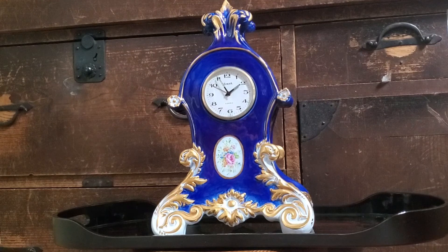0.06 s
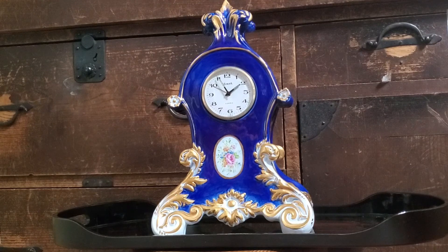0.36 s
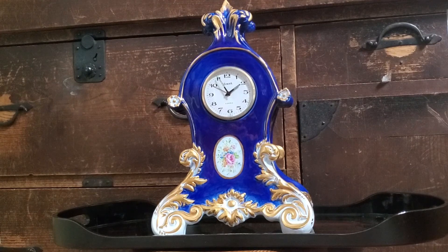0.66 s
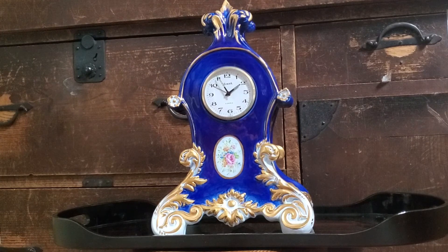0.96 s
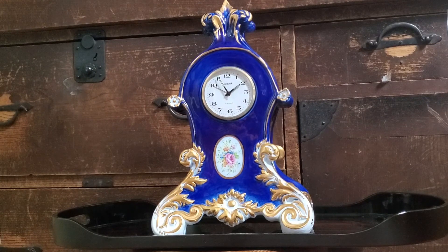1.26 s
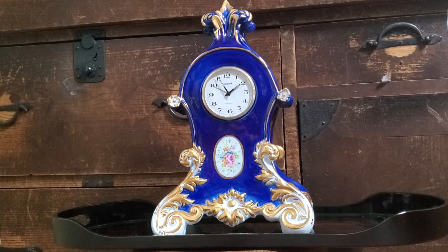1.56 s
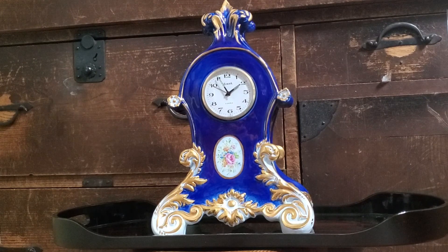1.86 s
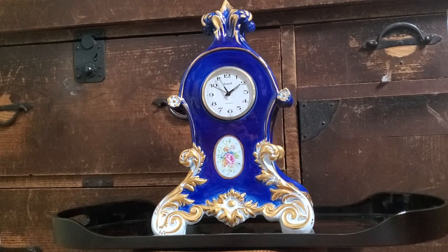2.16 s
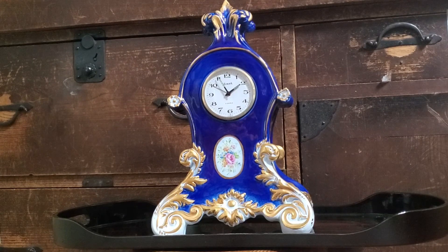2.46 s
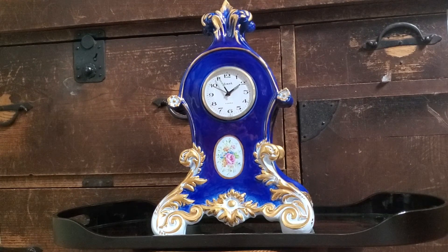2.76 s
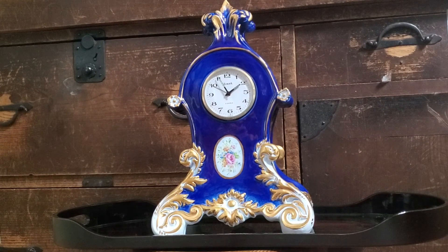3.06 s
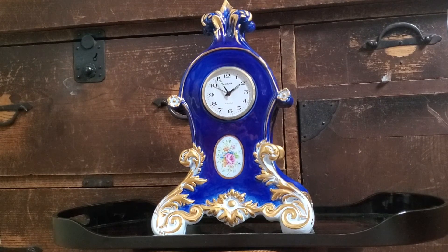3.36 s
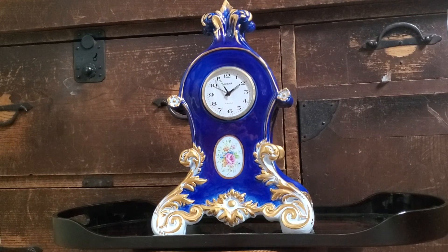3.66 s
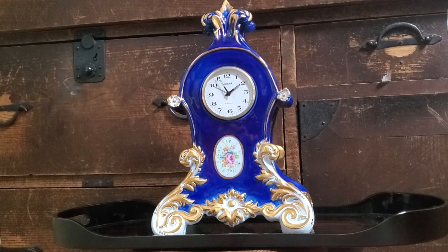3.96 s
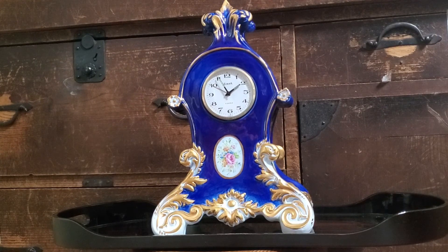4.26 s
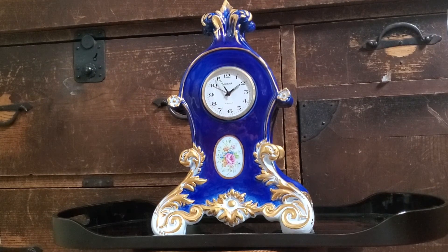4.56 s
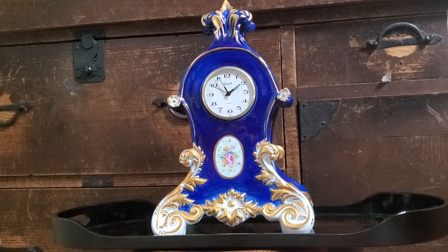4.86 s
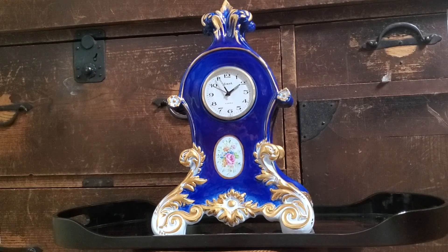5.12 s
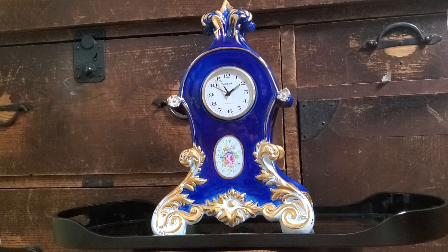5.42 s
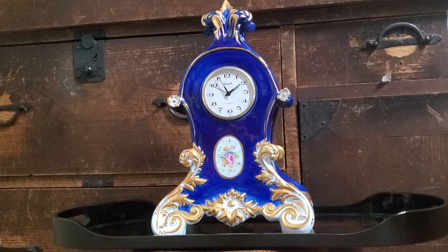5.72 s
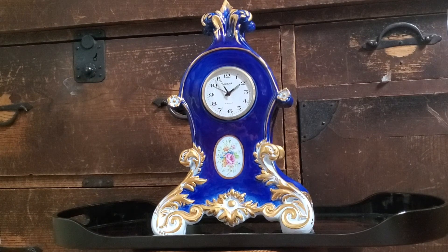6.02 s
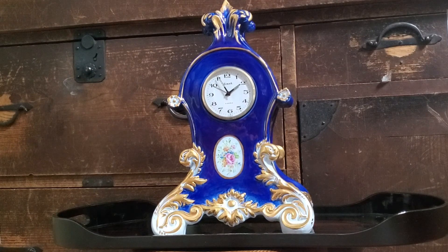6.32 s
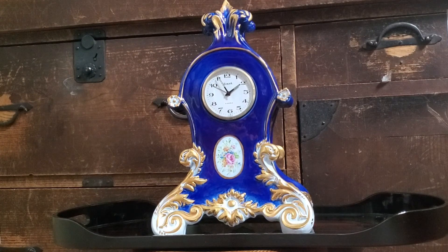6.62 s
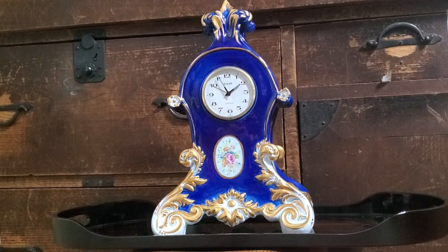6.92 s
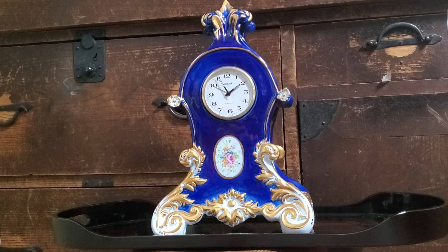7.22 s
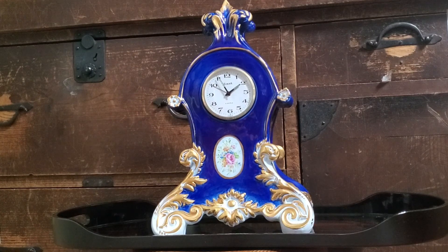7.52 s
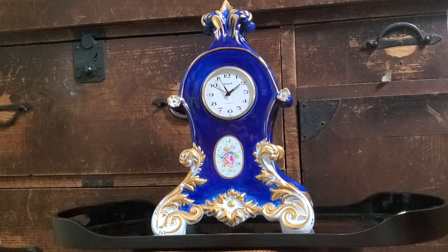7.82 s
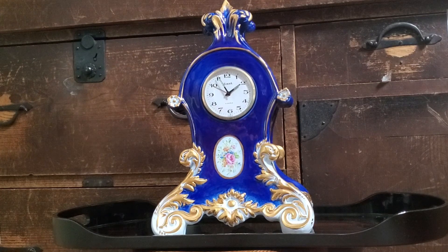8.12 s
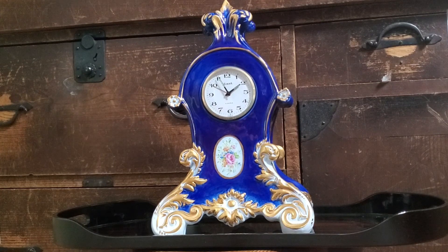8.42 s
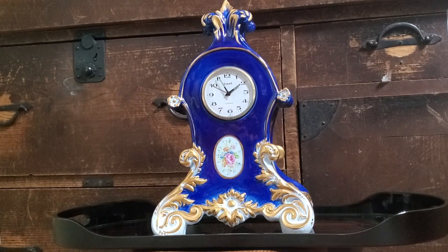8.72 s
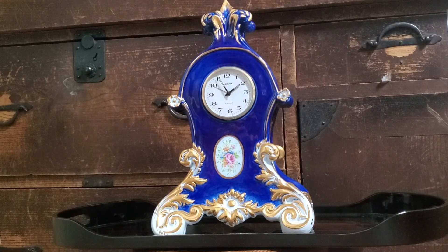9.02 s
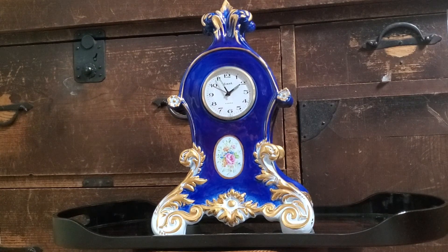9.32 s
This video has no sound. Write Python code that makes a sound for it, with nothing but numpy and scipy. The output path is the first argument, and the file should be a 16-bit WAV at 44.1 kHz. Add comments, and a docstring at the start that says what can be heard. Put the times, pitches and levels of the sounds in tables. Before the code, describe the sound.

Fast, bright, metallic ticking from a wind-up porcelain clock, with a soft throbbing hum and low rumble behind it.

```python
"""A small wind-up clock in a porcelain case ticks five times a second in a quiet room.
At each beat a rocking lever catches a toothed wheel with one of its two tips. This quick run of tiny hits
rings the brass works and the case; the tips strike differently, so tick and tock differ.
Far off, a motor hums and throbs over a low rumble, and a few faint knocks sound in the room."""
import sys
import numpy as np
from scipy import signal
from scipy.fft import rfft, irfft
from scipy.io import wavfile

SR = 44100
rng = np.random.default_rng(int(sys.argv[2]) if len(sys.argv) > 2 else 0)


def generate_wav(signal):
    """Clip the signal to [-1, 1] and save it as 16-bit WAV at the path in sys.argv[1]."""
    frames = np.transpose(np.atleast_2d(signal))
    scaled = np.clip(frames, -1, 1) * 32767
    pcm = np.round(scaled).astype(np.int16)
    wavfile.write(sys.argv[1], SR, pcm)


N = 418068
TIME = np.arange(N) / SR

# Levels in the tables are relative. A fade time is how long a sound takes to drop by 60 dB.
# hits in one beat (release, push, landing, bounces): (time from landing [ms], level [dB], hardness [0-1])
TICK_HITS = [(-8.8, -3.5, .17), (-4.8, -5, .12), (-1.8, -3, .2), (0.3, 0, 1), (2.3, -1.5, 1), (4.8, 0, .9),
             (7.3, -6, .8), (19, -15, 1), (25, -10.5, 1)]
TOCK_HITS = [(-9.2, -5, .9), (-5.8, -6, .9), (-2, -4, .95), (0.4, -1, 1), (3, -3, .8), (6, -3, .6),
             (10, -11, .8), (20, -13, .9)]
# how hard the wheel drives each tip of the lever: (time [s], level [dB])
TICK_DRIVE = [(0.4, -48.1), (2.4, -46.7), (2.8, -49.0), (3.21, -45.7), (3.61, -49.2), (5.21, -47.1),
              (6.01, -50.2), (6.42, -46.8), (9.22, -47.3)]
TOCK_DRIVE = [(0.2, -49.8), (1.8, -51.5), (4.61, -51.4), (5.01, -48.1), (5.81, -49.5), (6.21, -53.0),
              (7.02, -50.5), (9.42, -52.2)]
# ringing notes of works and case: (pitch [Hz], tick level [dB], tock level [dB], fade time [s])
CLOCK_NOTES = [(1152, -19, -22, 0.1), (1227, -16, -16, 0.1), (1545, -24, -23, 0.1), (1878, -15, -11, 0.1),
               (1927, -18, -13, 0.1), (2088, -25, -24, 0.1), (3090, -24, -21, 0.12), (3337, -15, -12, 0.16),
               (3391, -18, -18, 0.12), (3793, 0, -1, 0.09), (3835, -6, -10, 0.1), (4047, -9, -8, 0.12),
               (4376, -9, -7, 0.11), (4430, -6, -4, 0.1), (4554, -5, -5, 0.1), (4645, -5, 0, 0.09),
               (4688, -10, -6, 0.1), (4777, -9, -7, 0.11), (4925, -7, -9, 0.12), (5009, -6, -10, 0.15),
               (5055, -5, -4, 0.2), (5528, -8, -16, 0.1), (5611, -4, -9, 0.09), (5770, -20, -14, 0.12),
               (5955, -15, -13, 0.12), (6567, -14, -16, 0.1), (8435, -18, -25, 0.12),
               (8774, -22.5, -24, 0.7), (9300, -23, -23, 0.12), (9781, -21, -23, 0.12)]
# the many weak notes between them, played as noise: (pitch [Hz], tick level [dB], tock level [dB])
WEAK_NOTES = [(700, -37, -36), (1150, -13, -14), (2000, -13, -16), (2700, -17, -20), (3400, -8.5, -10.5),
              (4400, 0, 1), (5700, -1, -3), (6500, -2, -5), (7300, -12, -19), (9600, -8, -10.5),
              (11000, -19, -21), (12000, -31, -31), (14000, -34, -34)]
# faint knocks: (time [s], level [dB], pitch [Hz], fade time [s])
KNOCKS = [(4.367, -65, 1150, .08), (4.375, -57, 620, 0.092), (5.416, -55, 575, 0.035),
          (6.836, -57.5, 520, 0.18), (7.566, -62, 4900, .04), (7.96, -67, 520, .2)]
# slow rise and fall of the motor's main note: (time [s], level [dB])
MOTOR_SWELL = [(0.1, -32.5), (1.13, -37), (1.34, -33.5), (2.98, -32.4), (3.4, -38.5), (4.01, -31.5),
               (4.63, -35.5), (4.84, -32), (6.49, -35), (7.31, -33.5), (7.72, -32), (8.34, -34.0),
               (9.16, -32.5), (9.37, -36)]
# weaker motor and mains notes: (pitch [Hz], level [dB], level wobble [dB], phase wobble [rad])
HUM_NOTES = [(47.7, -48, 1.5, .4), (86, -55, 2, 1.5), (119.9, -56, 2, .6), (159, -62, 3, .9),
             (179.96, -50.7, .8, .1), (232, -67, 2, .9), (362, -78, 2, .8), (480, -83, 2, .8),
             (566, -80.5, 1.5, .8)]
# rumble and hiss of the room: (frequency [Hz], level [dB])
RUMBLE_SPECTRUM = [(20, -14), (35, -4), (55, 0.5), (85, -2.5), (130, -5.5), (210, -16.5), (290, -19.5),
                   (420, -32.5), (700, -41), (1100, -46), (2500, -49.5), (6000, -50), (10000, -53.5),
                   (14500, -57)]

BEAT_S, FIRST_BEAT_S = .200592, -.0036
BEAT_SCATTER_S, BEAT_SCATTER_DB = .0002, .25   # chance change from beat to beat
HIT_SCATTER_MS, HIT_SCATTER_DB = .2, .8   # and from hit to hit
TICK_DB, TOCK_DB = -0.6, 0.3
NOTES_DB, WEAK_DB, WEAK_FADE_S = -9.7, -10.0, .14
CRACK_BOOST_DB, CRACK_FADE_S = 7.3, .015
MOTOR_HZ, MOTOR_GAIN_DB = 58.6, 0.43
THROB_HZ, THROB_DB, THROB_PEAK_S = 1.612, -14, .142   # rate, level of the weaker note, time of one peak
ECHO_DB, ECHO_FADE_S, WALL_CUT_HZ = -11.5, .31, 8000
RUMBLE_DB, TOP_CUT_HZ = -42.5, 14600


def clock():
    """The lever's two tips strike in turn, and every hit sets the clock ringing."""
    ticks = lever_clicks(beats(0, TICK_DRIVE), TICK_HITS, soft_hz=1570)
    tocks = lever_clicks(beats(1, TOCK_DRIVE), TOCK_HITS, soft_hz=1550)
    ringing_ticks = from_db(TICK_DB) * convolve(ticks, clock_ring(0))
    ringing_tocks = from_db(TOCK_DB) * convolve(tocks, clock_ring(1))
    return ringing_ticks + ringing_tocks


def beats(side, drive):
    """Every other swing lands on the tick (side 0) or tock (side 1) tip: (time [s], level [dB])."""
    times = np.arange(FIRST_BEAT_S + side * BEAT_S, TIME[-1], 2 * BEAT_S)
    late, softer = rng.standard_normal((len(times), 2)).T
    level_db = np.interp(times, *np.transpose(drive)) - BEAT_SCATTER_DB * softer
    return np.transpose([times + BEAT_SCATTER_S * late, level_db])


def lever_clicks(beat_rows, hits, soft_hz):
    """One click for each hit; no two teeth of the wheel land quite alike."""
    beat_s, beat_db = np.transpose(beat_rows)
    hit_ms, hit_db, hardness = np.transpose(hits)
    late, harder = rng.standard_normal((2, len(beat_s), len(hit_ms)))
    times = beat_s[:, None] + (hit_ms + HIT_SCATTER_MS * late) / 1000
    force = from_db(beat_db[:, None] + hit_db + HIT_SCATTER_DB * harder)
    heard = (times >= 0) & (times < TIME[-1])
    samples = (times[heard] * SR).astype(int)
    sharp = np.bincount(samples, (force * hardness)[heard], N)
    soft = np.bincount(samples, (force * np.sqrt(1 - hardness ** 2))[heard], N)
    # a soft, sliding hit drags back for longer and wakes mostly the low notes of the case
    return sharp - from_db(7.5) * low_pass(soft, soft_hz)


def clock_ring(side):
    """How brass and porcelain ring after one hit on the tick (side 0) or tock (side 1) tip."""
    t = TIME[:SR]
    signs = rng.choice([-1, 1], len(CLOCK_NOTES))
    notes = sum(sign * from_db(levels[side]) * np.sin(2 * np.pi * hz * t) * fade(t, fade_s)
                for (hz, *levels, fade_s), sign in zip(CLOCK_NOTES, signs))
    # the weak notes start with a short crack, then die quickly
    crack = from_db(CRACK_BOOST_DB) * fade(t, CRACK_FADE_S)
    spectrum = [(hz, levels[side]) for hz, *levels in WEAK_NOTES]
    weak = shaped_noise(spectrum, len(t)) * (crack + fade(t, WEAK_FADE_S))
    return from_db(NOTES_DB) * notes + from_db(WEAK_DB) * weak


def knocks():
    """Each knock is a fading burst of noise around one pitch."""
    out = np.zeros(N)
    for start_s, level_db, hz, fade_s in KNOCKS:
        band = signal.iirpeak(hz, Q=2.2, fs=SR)
        body = rms_one(signal.lfilter(*band, rng.standard_normal(N)))
        age = np.maximum(TIME - start_s, 0)
        out += from_db(level_db) * body * (TIME >= start_s) * fade(age, fade_s)
    return out


def motor_hum():
    """A strong low note throbs against a weaker one just below it, among several wavering notes."""
    swell_db = np.interp(TIME, *np.transpose(MOTOR_SWELL))
    turn = 2 * np.pi * (TIME - THROB_PEAK_S)
    pair = np.sin(MOTOR_HZ * turn) + from_db(THROB_DB) * np.sin((MOTOR_HZ - THROB_HZ) * turn)
    hum = from_db(MOTOR_GAIN_DB + swell_db) * pair
    for hz, level_db, wobble_db, wobble_rad in HUM_NOTES:
        gain = from_db(level_db + wobble_db * drift(0.92))
        hum += gain * np.sin(2 * np.pi * hz * TIME + wobble_rad * drift(0.89))
    return np.sqrt(2) * hum


def room_echo(x):
    """A smooth wash of echoes follows a short gap; the walls soak up its treble."""
    t = TIME[:SR]
    tail = rng.standard_normal(len(t)) * fade(t, ECHO_FADE_S) * (t > .004)
    tail /= np.sqrt(np.sum(tail ** 2))
    return from_db(ECHO_DB) * low_pass(convolve(x, tail), WALL_CUT_HZ)


def room_rumble():
    """A steady low rumble with a trace of hiss."""
    return from_db(RUMBLE_DB) * shaped_noise(RUMBLE_SPECTRUM, N)


def from_db(db):
    """Turn decibels into a number to multiply by."""
    return 10 ** (np.asarray(db) / 20)


def rms_one(x):
    """Scale a signal so its typical size (rms) is 1."""
    return x / np.sqrt(np.mean(x ** 2) + 1e-20)


def shaped_noise(spectrum, size):
    """Noise of typical size 1, shaped by rows of (frequency [Hz], level [dB])."""
    hz, level_db = np.transpose(spectrum)
    bins = np.maximum(np.fft.rfftfreq(size, 1 / SR), 1)
    gain = from_db(np.interp(np.log(bins), np.log(hz), level_db))
    return rms_one(irfft(rfft(rng.standard_normal(size)) * gain, size))


def drift(per_s):
    """A smooth random wobble of typical size 1 that changes about per_s times a second."""
    bins = np.fft.rfftfreq(N, 1 / SR)
    keep_slow = (bins > 0) / (1 + (bins / per_s) ** 2)
    return rms_one(irfft(rfft(rng.standard_normal(N)) * keep_slow, N))


def fade(t, fade_s):
    """A curve that drops by 60 dB in fade_s seconds."""
    return np.exp(-np.log(1000) * t / fade_s)


def convolve(x, response):
    """Let every sample of x set off a copy of the response."""
    return signal.fftconvolve(x, response)[:N]


def low_pass(x, hz):
    """Gently cut the treble above hz."""
    return signal.sosfilt(signal.butter(2, hz, fs=SR, output="sos"), x)


def scene():
    """Clock and knocks echo in the room, over hum and rumble; one channel."""
    near = clock() + knocks()
    rumble = room_rumble()
    return (near + room_echo(near) + motor_hum() + rumble)[None]


def record(dry):
    """Cut off the highest treble steeply."""
    return signal.sosfilt(signal.ellip(10, .1, 80, TOP_CUT_HZ, fs=SR, output="sos"), dry)


dry = scene()
out = record(dry)
generate_wav(out)
```